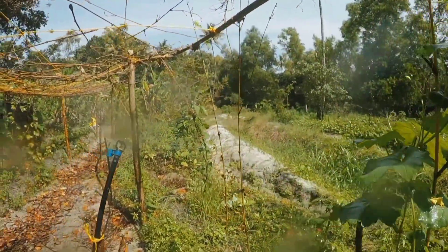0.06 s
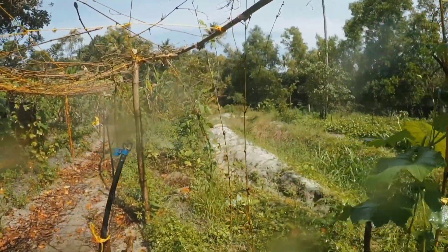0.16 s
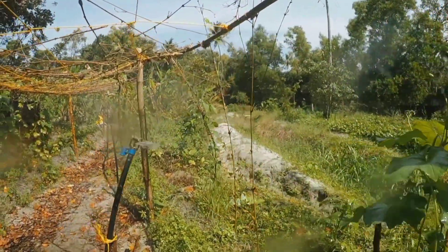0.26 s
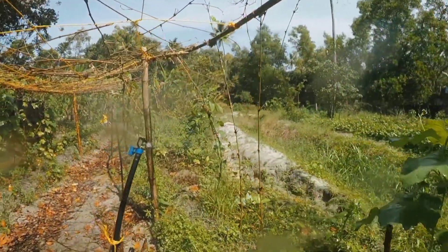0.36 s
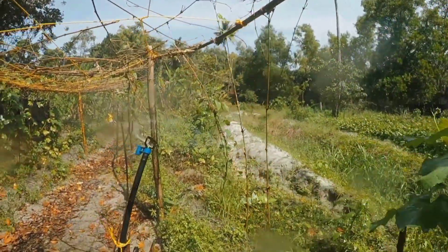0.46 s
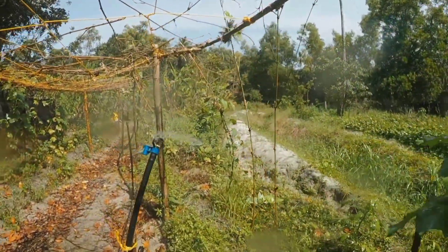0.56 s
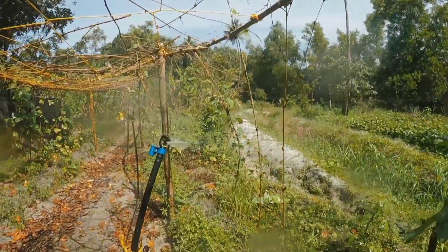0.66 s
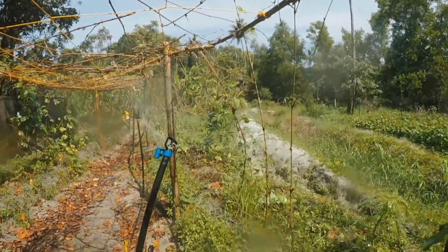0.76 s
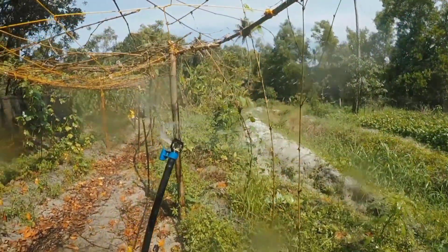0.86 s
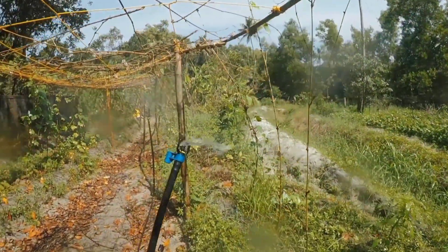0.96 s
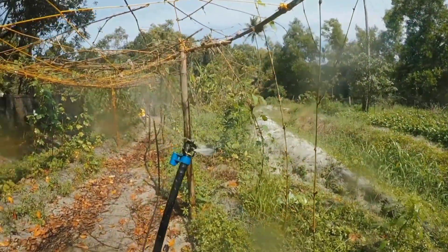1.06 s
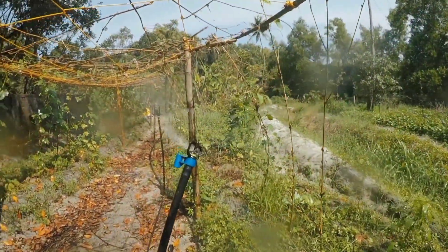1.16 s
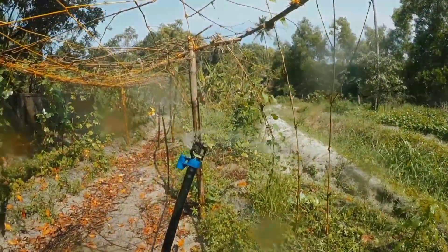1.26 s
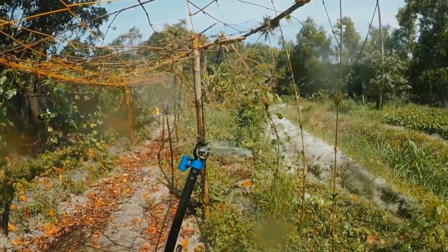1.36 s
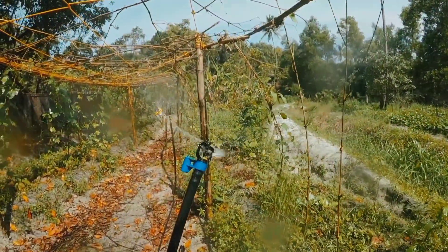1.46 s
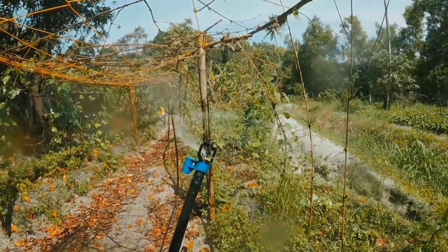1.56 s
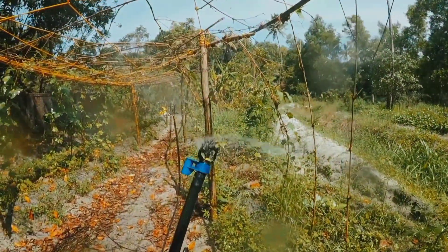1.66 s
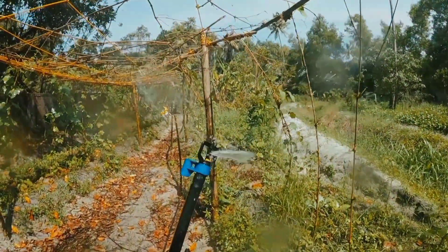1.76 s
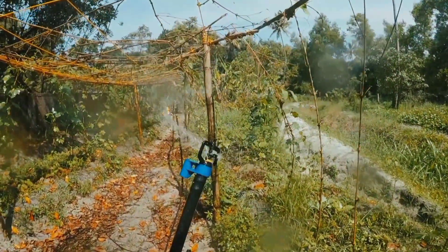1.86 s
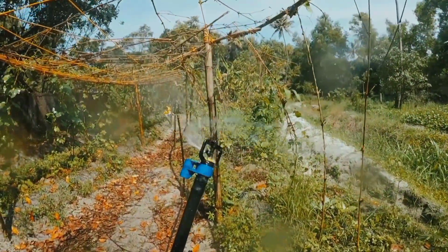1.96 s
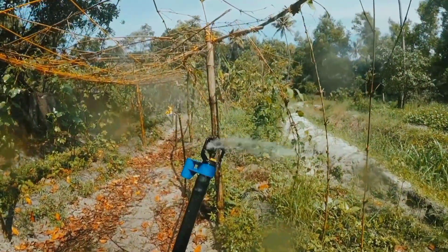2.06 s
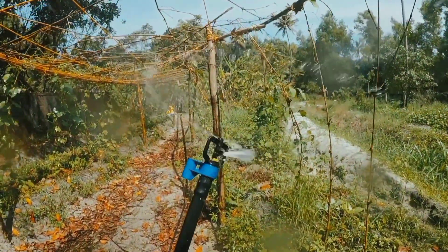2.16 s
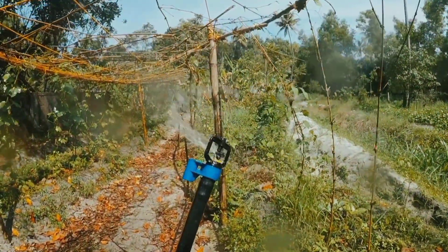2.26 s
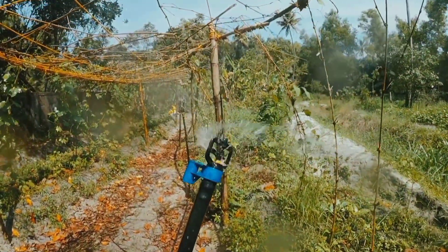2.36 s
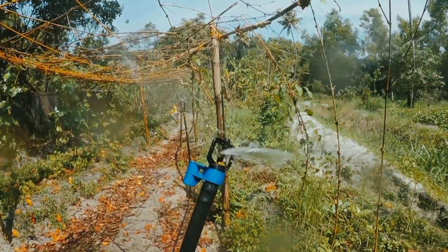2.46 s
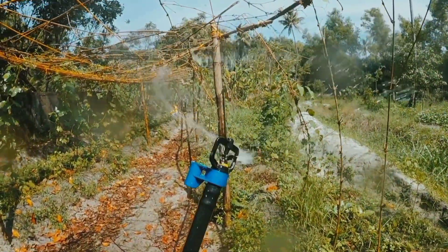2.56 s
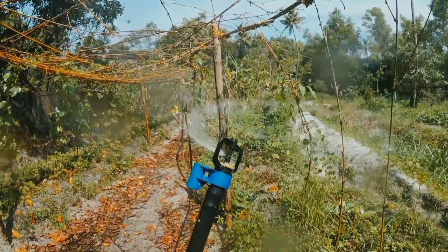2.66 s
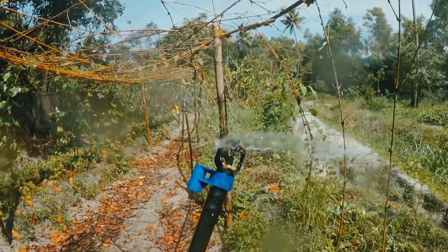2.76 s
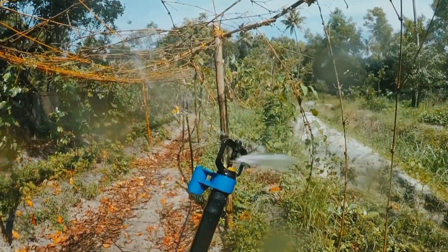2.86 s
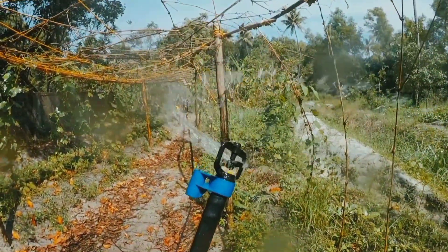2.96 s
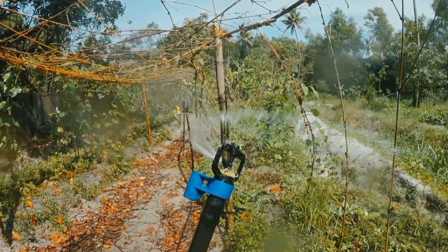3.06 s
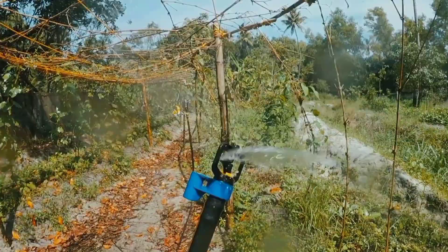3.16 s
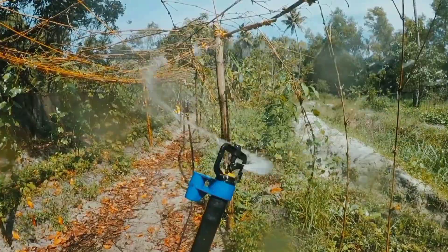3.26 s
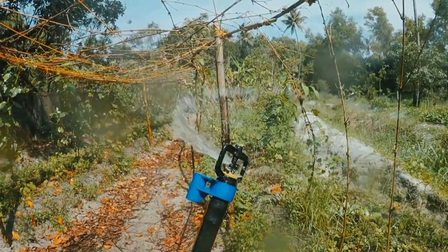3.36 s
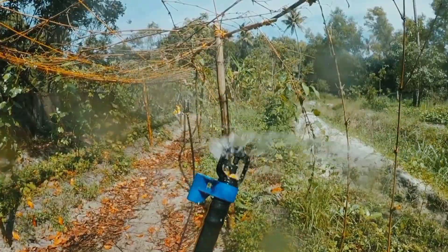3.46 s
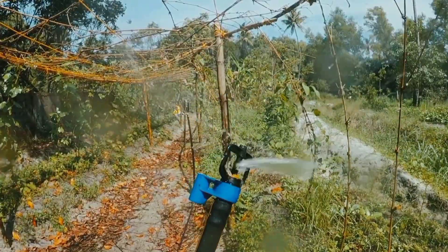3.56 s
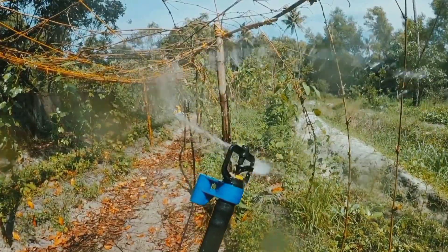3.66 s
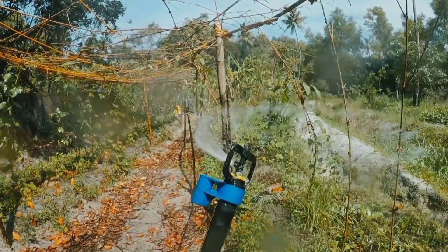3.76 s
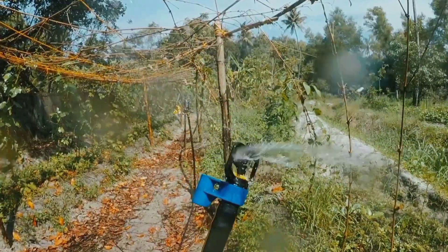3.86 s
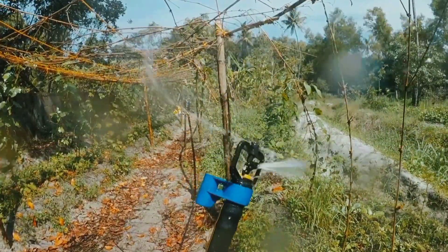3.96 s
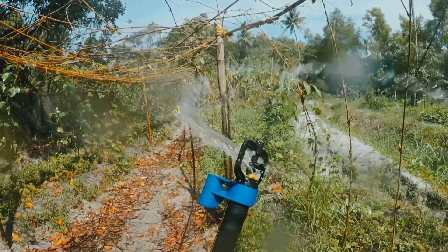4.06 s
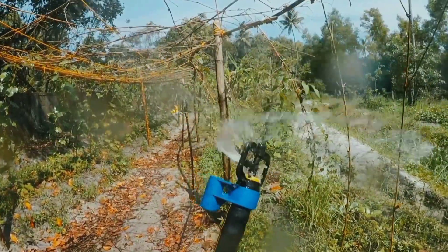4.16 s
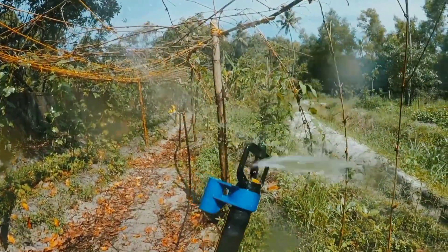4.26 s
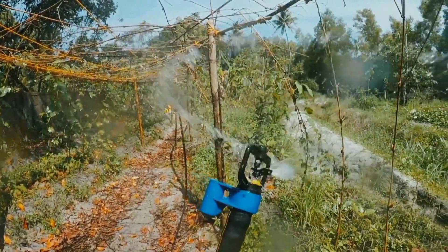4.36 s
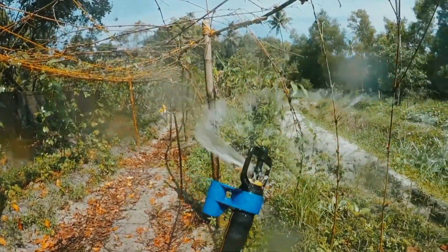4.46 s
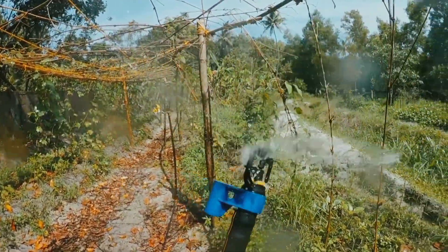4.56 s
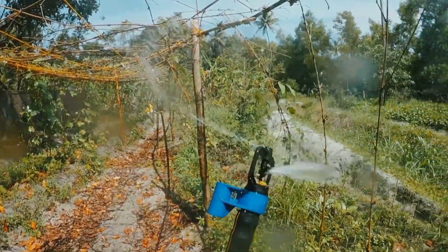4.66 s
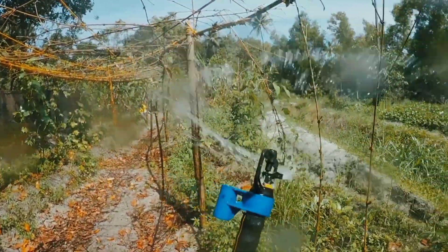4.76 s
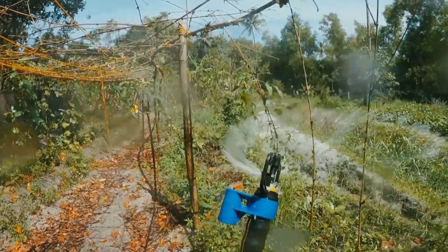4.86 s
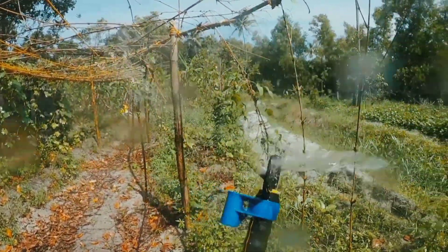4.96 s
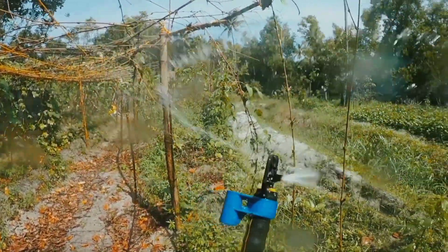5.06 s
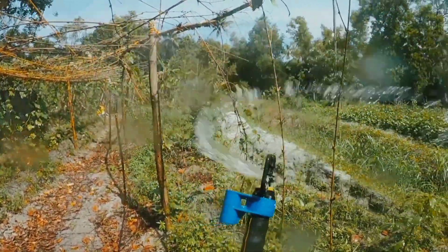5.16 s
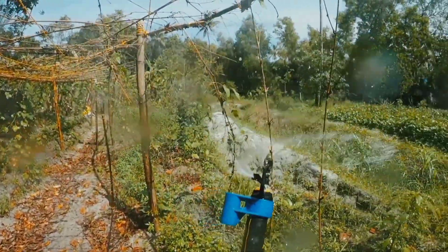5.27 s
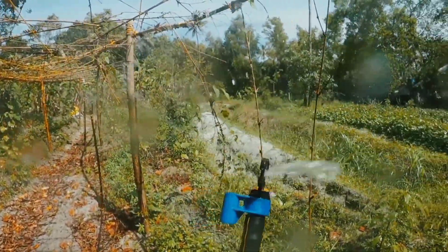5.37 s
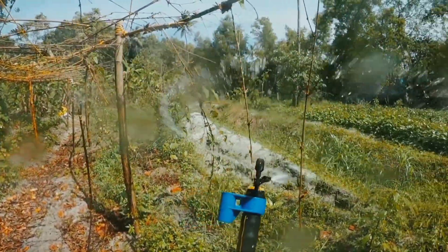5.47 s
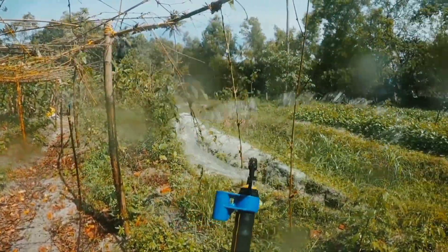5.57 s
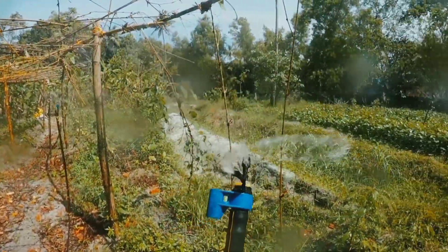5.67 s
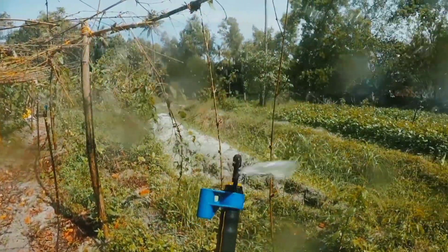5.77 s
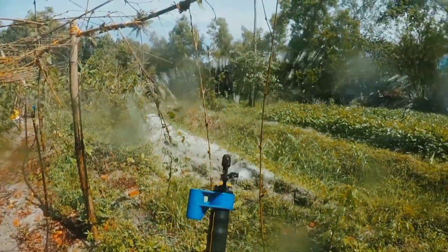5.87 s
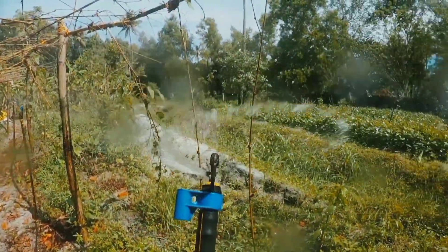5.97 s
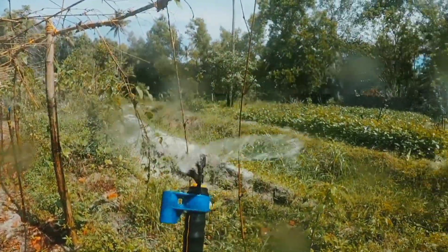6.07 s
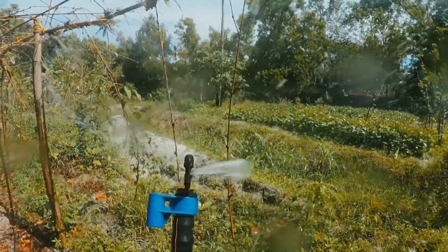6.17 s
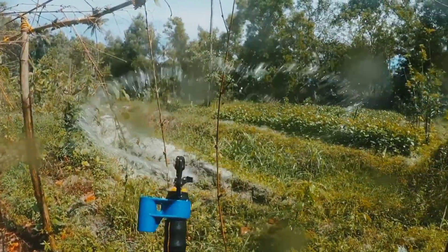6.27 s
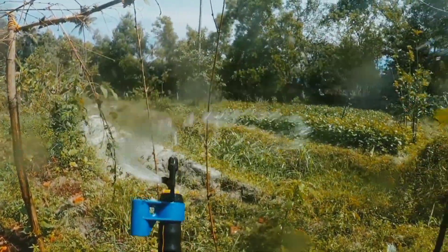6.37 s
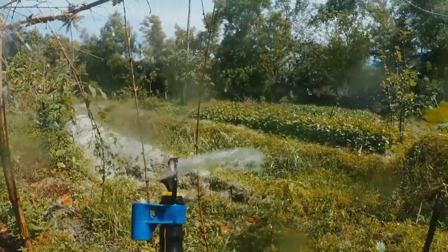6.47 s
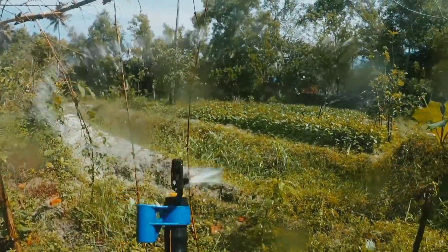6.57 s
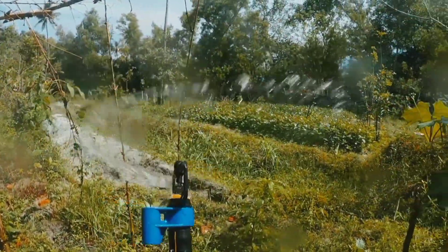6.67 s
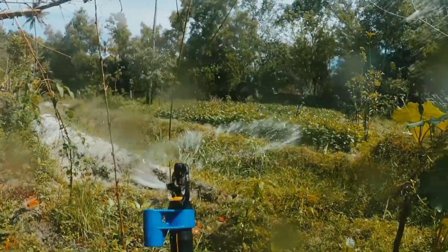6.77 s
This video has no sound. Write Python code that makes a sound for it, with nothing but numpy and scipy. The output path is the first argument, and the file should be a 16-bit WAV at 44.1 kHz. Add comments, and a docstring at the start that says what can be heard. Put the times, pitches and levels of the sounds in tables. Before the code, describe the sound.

A garden sprinkler hisses steadily and droplets tick and patter over a loud low hum with a deep throb beneath it.

```python
"""A loud low hum, perhaps a water pump, and the fine hiss of a spinning garden sprinkler.
The spray washes over the beds, droplets patter on leaves, and faint thin tones come and go.
A deep throb swells in under the hum and stays. The microphone moves close to the sprinkler and
away again; up close, spatter crackles and big drops tick thickly, ringing the wet housing."""
import sys
import numpy as np
from scipy import signal
from scipy.fft import rfft, irfft, next_fast_len
from scipy.io import wavfile
from scipy.ndimage import uniform_filter1d, map_coordinates

SR = 44100
rng = np.random.default_rng(int(sys.argv[2]) if len(sys.argv) > 2 else 0)


def int16_out(signal):
    """Quantize to a 16-bit WAV file."""
    q = np.round(np.clip(np.atleast_2d(signal).T, -1, 1) * 32767)
    wavfile.write(sys.argv[1], SR, q.astype(np.int16))


N = 300762
TIME_S = np.arange(N) / SR


def amp(db):
    return 10 ** (np.asarray(db) / 20)


def unit(x):
    return x / np.sqrt(np.mean(x ** 2) + 1e-20)


def each_unit(stack):
    """Each stereo sound of a stack at rms 1."""
    return stack / np.sqrt(np.mean(stack ** 2, axis=(1, 2), keepdims=True))


def along(points, hz):
    """Interpolate (f/Hz, value) points on a log axis."""
    f, v = np.transpose(points)
    return np.interp(np.log(hz + 1), np.log(f), v)


def curve(points):
    """Interpolate (t/s, value) points per sample."""
    return np.interp(TIME_S, *np.transpose(points))


def bell(centre_s, sigma_s):
    return np.exp(-.5 * ((TIME_S - centre_s) / sigma_s) ** 2)


def closeness():
    """One pass of the microphone: 0 far from the sprinkler, 1 at it."""
    return bell(centre_s=3.8, sigma_s=1.2)


def wobble(rate_hz):
    """Smooth random curve, rate_hz knots a second."""
    knots = rng.standard_normal(int(N * rate_hz / SR) + 4)
    return map_coordinates(knots, [np.arange(N) * rate_hz / SR])


def filtered(x, response):
    """Apply a frequency response by padded FFT."""
    n = x.shape[-1]
    padded = next_fast_len(n + min(n, SR // 2))
    return irfft(rfft(x, padded) * response(np.fft.rfftfreq(padded, 1 / SR)), padded)[..., :n]


def narrow(centre_hz, width_hz, channels):
    """Narrowband noise at rms 1, heard as a wavering tone."""
    white = rng.standard_normal((channels, N))
    return unit(filtered(white, lambda hz: 1 / (1 + (2 * (hz - centre_hz) / width_hz) ** 2)))


def pan(left_db):
    """Left and right gains, mean 1."""
    gains = amp([[left_db / 2], [-left_db / 2]])
    return gains / gains.mean()


def add(track, start_s, sound):
    start = int(np.clip(round(start_s * SR), 0, N - 1))
    track[:, start:start + sound.shape[1]] += sound[:, :N - start]


# Microphone port pair: f/Hz, left minus right/dB, phase difference/rad, coherence/0-1
PORT_RESPONSE = [(100, -3, 1.3, 0.8), (217, -8.5, 0.099, 0.64), (430, -11.5, 1.73, 0.92),
                 (577, -6, 2.36, 0.83), (803, -2, 4, 0.97), (1460, 0.5, 1.97, 0.4), (2190, 1, 2.23, 0.87),
                 (3200, -1.5, 0.54, 0.67), (3900, -2.5, 0.36, 0.84), (5100, -7.5, 1.5, 0.82),
                 (8340, -4.5, 0.5, 0.9), (11600, 0.5, 1.45, 0.7)]


def ports(pair, spectrum, focus=1):
    """Shared and diffuse signals to left and right; the mid gets the spectrum, focus scales coherence."""
    def response(hz):
        table = np.array(PORT_RESPONSE)
        balance_db, phase, coherence = (along(table[:, [0, k]], hz) for k in (1, 2, 3))
        turn = np.arccos(np.clip(coherence * focus, 0, 1)) / 2
        left = amp(balance_db / 2) * np.exp(.5j * phase)
        mix = np.array([[np.cos(turn) * left, np.sin(turn) * left],
                        [np.cos(turn) / left, -np.sin(turn) / left]])
        return mix * amp(along(spectrum, hz)) / np.linalg.norm(mix.mean(axis=0), axis=0)
    return filtered(pair[..., None, :, :], response).sum(axis=-2)


def rush(spectrum, patchy_db):
    """Stereo noise with random time-frequency patches of gain; mid at rms 1."""
    bins = signal.stft(rng.standard_normal((2, N)), nperseg=256)[2]
    patches = uniform_filter1d(rng.standard_normal(bins.shape[1:]), size=8, axis=0)
    patches = unit(uniform_filter1d(patches, size=4, axis=1))
    pair = signal.istft(bins * amp(patchy_db * patches), nperseg=256)[1][:, :N]
    stereo = ports(pair, spectrum)
    return stereo / stereo.mean(axis=0).std()


# Hum tone: t/s, level/dB
HUM_LEVEL = [(0, -19.5), (2.3, -19), (3.6, -20.5), (4.8, -23), (5.5, -19.5), (6.82, -19.5)]
# Brief dips: t/s, depth/dB
LEVEL_DIPS = [(1.265, 6), (2.87, 8), (4.18, 9)]
# Side tones: f/Hz, width/Hz, level/dB
HUM_SIDE_TONES = [(144.5, 11, -37.5), (236.8, 16, -35.5), (289, 12.4, -38), (331.7, 14, -45.5)]
# Noise around the hum: f/Hz, relative density/dB
DRONE_SPECTRUM = [(90, -47), (115, -22.5), (145, 2), (200, 0.5), (330, -4.5), (365, -10.5), (410, -11),
                  (500, -19.5), (650, -31.5), (900, -82)]


def hum(hum_hz=192.25, neighbour_hz=199.8, onset_s=.012):
    """A tone with a faint octave beats with a weaker neighbour, amid side tones and slowly rising noise."""
    level_db = curve(HUM_LEVEL) - sum(depth * bell(s, sigma_s=0.015) for s, depth in LEVEL_DIPS)
    phase = 2 * np.pi * np.cumsum(hum_hz + 0.23 * wobble(2.9)) / SR + 0.24 * wobble(30)
    tone = np.sin(phase) * pan(-6)
    octave = amp(-23.5 - 6.5 * closeness()) * np.sin(2 * phase) * pan(-13)
    neighbour = amp(-13) * np.sin(2 * np.pi * neighbour_hz * TIME_S) * pan(-2.5)
    sides = sum(amp(db) * narrow(hz, width, channels=1) for hz, width, db in HUM_SIDE_TONES) * pan(-9)
    drone = amp(-30.5 + 0.52 * TIME_S) * rush(DRONE_SPECTRUM, patchy_db=1.5)
    gain = np.sqrt(2) * amp(level_db + 0.68 * wobble(28))
    fade_in = np.sin(np.pi / 2 * np.minimum(TIME_S / onset_s, 1)) ** 2
    return fade_in * (gain * (tone + octave + neighbour) + sides + drone)


# Base for wash, hiss and mist: t/s, level/dB
SPRAY_LEVEL = [(0, -50.5), (1.1, -50), (1.9, -47.5), (3.2, -45.5), (3.9, -46.5), (4.8, -47.5), (6.3, -48),
               (6.82, -45.5)]
# Water on leaves: f/Hz, relative density/dB
WASH_SPECTRUM = [(300, -11), (600, 3), (800, 0), (1050, 0.5), (1400, 5.5), (1900, 1.5), (2600, 1),
                 (3300, 3.5), (4000, 1.5), (4700, -3.5), (6000, -2.5), (10000, -42)]
# Nozzle: f/Hz, relative density/dB
HISS_SPECTRUM = [(2000, -24), (4500, -8), (5500, -4.5), (6300, 1.5), (7300, 0.5), (8300, -3.5), (9800, -1),
                 (11000, -10.5), (12500, -9), (14000, -22), (15500, -48)]


def spray():
    """The jet hisses at the nozzle and washes over the leaves; both flutter together."""
    base_db, flutter = curve(SPRAY_LEVEL), wobble(60)
    wash = amp(base_db + 1.24 - 2 * closeness() + 0.98 * flutter) * rush(WASH_SPECTRUM, patchy_db=1.5)
    hiss = amp(base_db + 0.3 + 0.39 * flutter) * rush(HISS_SPECTRUM, patchy_db=2)
    return wash + hiss


# Finest droplets: f/Hz, relative density/dB
MIST_SPECTRUM = [(1500, -20), (3500, 2), (4700, 0), (6500, 5.5), (10000, 5.5), (13000, -25), (15500, -26)]


def mist(rate_per_s=250, spread_db=4):
    """The finest droplets prickle in the treble, following the spray's level."""
    hits = rng.random((2, N)) < rate_per_s / SR
    impulses = hits * amp(spread_db * np.clip(rng.standard_normal((2, N)), -2, 2))
    return amp(curve(SPRAY_LEVEL) - 6) * unit(ports(impulses, MIST_SPECTRUM))


def patter(far_per_s=15, close_extra_per_s=22, centre_hz=2700, scatter_oct=0.27):
    """Small drops fall at random, thicker and harder near the sprinkler."""
    close = closeness()
    hits = np.flatnonzero(rng.random(N) < (far_per_s + close_extra_per_s * close) / SR)
    size, spot, softness, wetness = np.clip(rng.standard_normal((len(hits), 4)), -1.5, 1.5).T
    tap_db = -51.5 + 6 * close[hits] + 2.5 * size
    pitch_hz = centre_hz * 2 ** (scatter_oct * spot)
    thud_db, splash_db = -5 + 3 * softness, -3 + 3 * wetness
    return drops(np.transpose([hits / SR, tap_db, pitch_hz, thud_db, splash_db]))


# Thin tones: start/s, end/s, f/Hz, width/Hz, relative level/dB
THIN_TONES = [(0.06, 0.28, 4490, 40, -54), (0.62, 0.74, 4480, 40, -55), (2.276, 2.48, 1470, 140, -46),
              (3.45, 3.66, 1450, 200, -45), (5.35, 6.202, 1398, 40, -55.5)]


def thin_tones():
    """Faint narrow bands of noise swell and fade."""
    out = np.zeros((2, N))
    for start_s, end_s, hz, width_hz, db in THIN_TONES:
        progress = np.clip((TIME_S - start_s) / (end_s - start_s), 0, 1)
        envelope = np.sqrt(np.abs(np.sin(np.pi * progress)))
        out += amp(db + 0.5) * narrow(hz, width_hz, channels=2) * envelope
    return out


# Drop impact: f/Hz, gain/dB
IMPACT_SPECTRUM = [(300, 7), (550, 10.5), (850, 1.5), (1500, 3.5), (4200, 8.5), (4800, 7.5), (6000, 8.5),
                   (8300, 10), (11000, 5.5), (13500, -10), (15500, -16)]
TOUCH_S = .0013  # first touch to slap


def impacts(count, slap_t60_s=0.0099, scatter_t60_s=.022, roughness=0.12):
    """Stereo force of each drop: it touches, slaps down and throws off spray."""
    t = np.arange(SR // 50) / SR - 2 * TOUCH_S
    touch = amp(-12) * (t > -TOUCH_S)
    slap = amp(-60 * np.abs(t) / slap_t60_s)
    scatter = amp(-21 - 60 * np.abs(t) / scatter_t60_s)
    force = roughness * np.where(t < 0, touch, slap + scatter) * rng.standard_normal((count, 2, len(t)))
    hit = np.searchsorted(t, 0)
    force[:, 0, hit] += 1
    lag = rng.integers(SR // 1500, size=count)  # the slap runs round the housing in up to 0.7 ms
    force[np.arange(count), 1, hit + lag] += .35
    return ports(force, IMPACT_SPECTRUM, focus=0.71)


def ring(force, edges_hz, order):
    """Causal band-pass resonance, slightly detuned per drop, each at rms 1."""
    low, high = edges_hz
    detune = 2 ** (.08 * rng.uniform(-1.74, 1, (len(force), 1, 1)))
    denominator = signal.butter(order, 1, analog=True)[1]

    def response(hz):
        detuned_hz = (hz + 1) / detune
        offset = (detuned_hz - low * high / detuned_hz) / abs(high - low)
        return 1 / np.polyval(denominator, 1j * offset)
    return each_unit(filtered(force, response))


# Tap resonances of the wet housing: lower edge/Hz, upper edge/Hz
TAP_BANDS = [(1550, 2520), (2750, 4150)]
THUD_BAND_HZ, SPLASH_BAND_HZ, SNAP_BAND_HZ = (923, 1840), (5100, 6500), (8360, 13100)
# Big drops on the housing: t/s, tap level/dB, f/Hz, thud re tap/dB, splash re tap/dB
HOUSING_DROPS = [(0.0647, -51, 1930.0, 15, -11), (0.1026, -53, 1930.0, 18, -24),
                 (0.5245, -48, 2090.0, 13, -13), (0.5335, -42, 2180, 7, -13.5),
                 (0.6334, -50, 2160.0, 13.5, -10), (1.0922, -33, 2200, 1, -12),
                 (1.2574, -46.0, 2600, 7, -13), (1.3784, -35.5, 2950, 0, -8),
                 (1.4626, -40, 2830, -20.5, -8), (1.6611, -38.5, 3080.0, -2, -4),
                 (1.7191, -33, 2580, -19, -3), (1.7872, -41, 2550, -10, -20),
                 (1.8088, -33, 2420.0, -11, -14), (1.8255, -33.5, 2800.0, 2, -18),
                 (1.8485, -32, 2620.0, -10, -12), (1.9211, -38.0, 2440.0, 3.5, -3),
                 (2.0226, -35.5, 2450, -15.0, -10), (2.1072, -43, 2830.0, -2, 2.5),
                 (2.2022, -33, 2420.0, -3, -6), (2.295, -36.0, 2670, -15.0, -9),
                 (2.4117, -42.5, 2120.0, 16.5, 0), (2.423, -41.5, 2740.0, 5, 4),
                 (2.4471, -27.5, 2530, -4, -8.5), (2.6899, -33.5, 2600, -10, -1.5),
                 (2.722, -34.5, 2320, -10.0, -15.5), (2.7653, -30, 2720, -5.0, -2),
                 (2.8416, -25.5, 3120, -2, -2.5), (2.9921, -36.5, 2780, -10, -3),
                 (3.0088, -31, 2730, -6, -5.5), (3.0524, -32, 3050.0, -2, -4.0),
                 (3.15, -38, 2550.0, 5, 2.5), (3.2058, -33, 2410, -5, -9), (3.2397, -35.5, 2730.0, 3.5, -2),
                 (3.2821, -40, 2590.0, -4, 1.5), (3.3249, -41, 3000, 1, -5),
                 (3.3661, -33.5, 2570.0, -11, -2), (3.4087, -31, 2900, 2.5, 0.5),
                 (3.4304, -37.5, 3000, -4, 2), (3.4466, -29.5, 3070, -6, -3),
                 (3.4934, -31.5, 2390.0, -20, -3), (3.5161, -27, 2680, -5, -7),
                 (3.557, -32.5, 2460.0, -1, -4), (3.5987, -33, 2100, 0, -20),
                 (3.6261, -36.5, 2520.0, 1, -2), (3.6615, -36.5, 3100, -10, -5),
                 (3.8131, -28.5, 3000, 1, -3), (3.8527, -35.5, 2900.0, -1, 0),
                 (3.8592, -32.5, 2030.0, 2, -15.5), (3.8932, -25, 3230, 3.5, -5.5),
                 (3.9606, -39.5, 2700, -10, -3), (4.0234, -33.5, 2400.0, -7, -16),
                 (4.0832, -35.5, 2890.0, -9, -0.5), (4.1257, -24.5, 2750, -5, -2.5),
                 (4.1311, -34, 2460.0, -13.0, -1), (4.1734, -30.5, 2680, -2, -5),
                 (4.2052, -32, 3120.0, -7, -1.5), (4.2521, -31, 2970, -15, -6), (4.2897, -27, 2300, -9, -8),
                 (4.3164, -39.5, 2270.0, -7, 3), (4.3874, -33, 2400, 1, -1.5),
                 (4.4065, -34.5, 2600, -8, -2), (4.4225, -38, 2800, -8, -10),
                 (4.4382, -32.5, 2960, 3.5, 0.5), (4.4819, -31, 2870.0, 0, -1.5),
                 (4.4884, -42, 2950, -6, 8), (4.5265, -35, 3010.0, -5, -2.5), (4.5477, -30, 2320, 4, -1),
                 (4.6355, -38.5, 2470.0, -13, -1), (4.654, -36, 2750.0, -4, -0.5),
                 (4.7265, -23, 2330, -15, -10.5), (4.8472, -33.5, 2960.0, -7, -3),
                 (4.8631, -29.5, 3170.0, -3.5, -6), (4.9619, -29.5, 2400, -10, -5.5),
                 (5.0085, -39, 2820.0, -3, -2), (5.1312, -35, 2760.0, -19, -12),
                 (5.4877, -36, 2830, -8, -18), (5.5357, -39.5, 2490, -19, -17),
                 (5.8291, -29.5, 2650, -10, -13), (6.279, -25.5, 2380.0, -7, -9.5),
                 (6.5144, -39.5, 2370.0, -17.5, -9), (6.585, -24, 2010, 1, -9)]


def drops(rows, octave_off_db=-17):
    """Each impact rings a woody tap, weighted towards its pitch, over a dull thud and a bright splash."""
    hit_s, tap_db, pitch_hz, thud_db, splash_db = np.transpose(rows)[..., None, None]
    force = impacts(len(rows))
    tap = 0
    for band_hz in TAP_BANDS:
        distance_oct = np.log2(np.mean(band_hz) / pitch_hz)
        tap += amp(octave_off_db * distance_oct ** 2) * ring(force, band_hz, order=2)
    snap = amp(tap_db + splash_db + 20.5) * ring(force, SNAP_BAND_HZ, order=2)  # hard splashes snap more
    splash = amp(splash_db) * (ring(force, SPLASH_BAND_HZ, order=1) + snap)
    thud = amp(thud_db) * ring(force, THUD_BAND_HZ, order=2)
    sounds = amp(tap_db) * (each_unit(tap) + thud + splash)
    out = np.zeros((2, N))
    for start_s, sound in zip(hit_s.ravel() - 2 * TOUCH_S, sounds):
        add(out, start_s, sound)
    return out


# Stroke overtones: harmonic number, relative level/dB
THROB_HARMONICS = [(2, 2), (3, -1), (5, -11), (6, -20), (7, -19)]
# Rumble: f/Hz, relative density/dB
RUMBLE_SPECTRUM = [(10, -1), (25, 1), (75, 3), (125, 6), (170, -26), (260, -35), (500, -79)]


def throb(stroke_hz=47.3, start_s=1.2, swell_s=2.1):
    """Slightly uneven strokes with phase-locked overtones swell in over a deep rumble and stay."""
    rise = np.clip((TIME_S - start_s) / swell_s, 0, 1)
    swell = amp(-37) + np.sin(np.pi / 2 * rise) ** 2
    phase = 2 * np.pi * stroke_hz * TIME_S + 0.2 * wobble(14)
    overtones = sum(amp(db + 0.44 * np.log(k + 1) * wobble(18)) * np.cos(k * phase)
                    for k, db in THROB_HARMONICS)
    overtones *= amp(-30 + 3.5 * closeness())
    strokes = -np.sqrt(2) * swell * (amp(-18) * np.cos(phase) + overtones)
    deep_noise = unit(filtered(rng.standard_normal(N), lambda hz: amp(along(RUMBLE_SPECTRUM, hz))))
    rumble = amp(-28.5) * swell ** 0.67 * deep_noise
    return (amp(0.55 * wobble(14)) * strokes + rumble) * pan(-4)


# Knocks on the microphone's body: t/s, right-channel level/dB, f/Hz
BODY_KNOCKS = [(1.2576, -38.5, 650), (3.8582, -27, 560), (6.28, -26, 600)]


def knocks(t60_s=0.0018, left_gain=0.17):
    """A few drops also land with a short, low knock on the microphone's body."""
    out, t = np.zeros((2, N)), np.arange(SR // 50) / SR
    for hit_s, db, hz in BODY_KNOCKS:
        push = np.sin(2 * np.pi * hz * t) * amp(-60 * t / t60_s) * (1 - np.exp(-t * hz))
        add(out, hit_s - TOUCH_S / 2, amp(db) * unit(push) * np.array([[left_gain], [1]]))
    return out


# Fine spatter: f/Hz, relative density/dB
CRACKLE_SPECTRUM = [(700, -18), (1400, -4), (3600, -5.5), (4700, -7), (7000, -6), (15500, -28)]


def crackle(peak_per_s=65, spread_db=4, level_db=-47.5):
    """Near the sprinkler, fine spatter ticks dryly among the big drops."""
    hits = rng.random((2, N)) < peak_per_s * closeness() / SR
    ticks = hits * amp(spread_db * np.clip(rng.standard_normal((2, N)), -2, 1))
    return amp(level_db) * unit(ports(ticks, CRACKLE_SPECTRUM, focus=0.22))


def scene():
    """Hum and throb below; water and thin tones above."""
    low = hum() + throb()
    water = spray() + mist() + drops(HOUSING_DROPS) + knocks() + patter() + crackle()
    return low + water + thin_tones()


def record(dry):
    """Hard limit at full scale, then cut above 15.7 kHz."""
    return filtered(np.clip(dry, -1, 1), lambda hz: hz < 15700)


dry = scene()
out = record(dry)
int16_out(out)
```